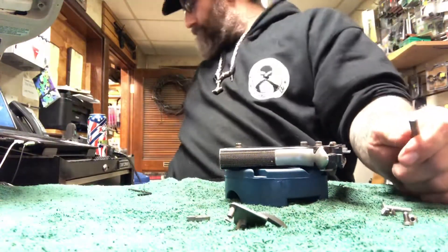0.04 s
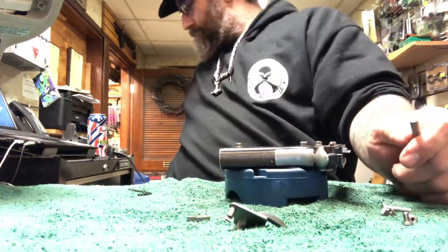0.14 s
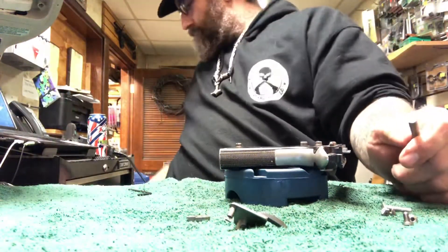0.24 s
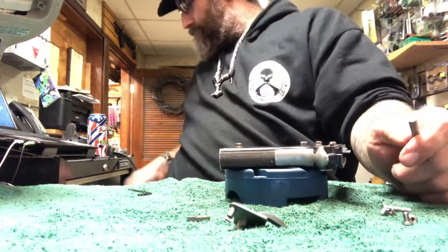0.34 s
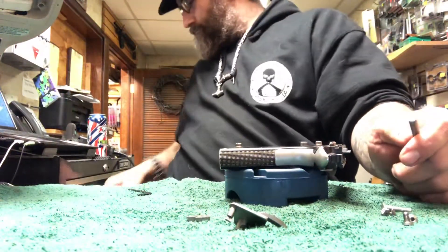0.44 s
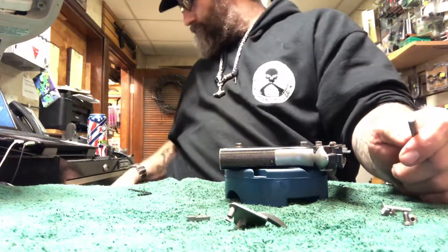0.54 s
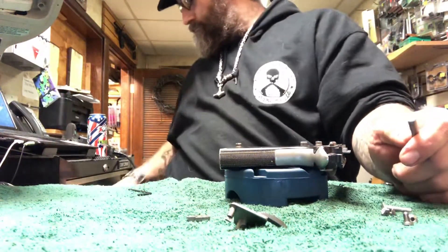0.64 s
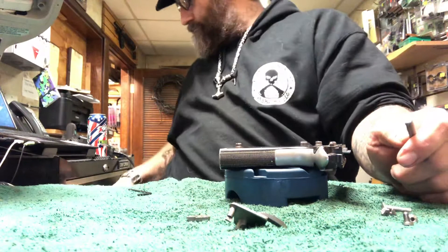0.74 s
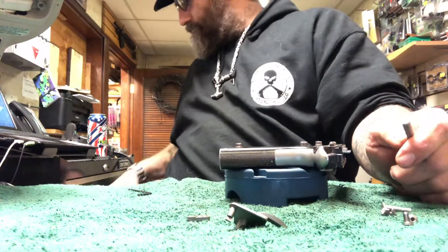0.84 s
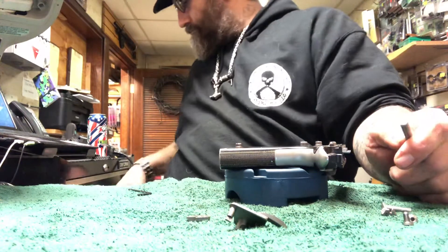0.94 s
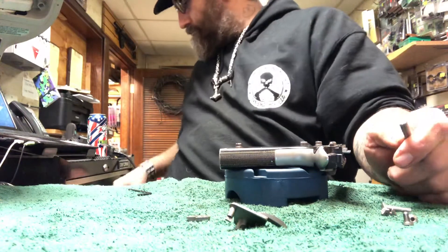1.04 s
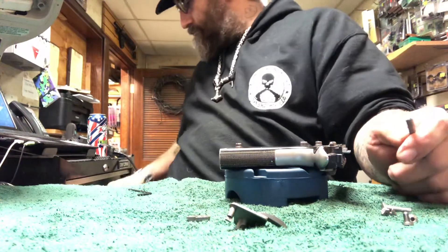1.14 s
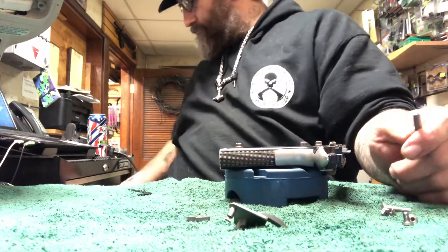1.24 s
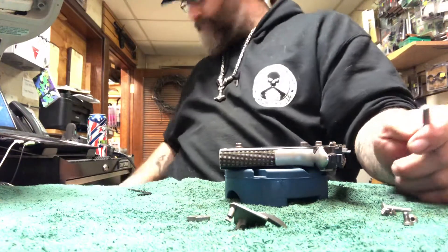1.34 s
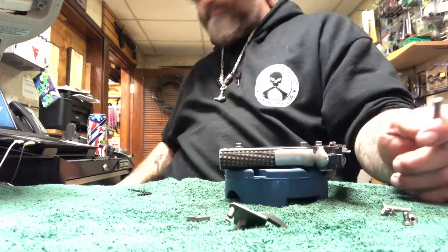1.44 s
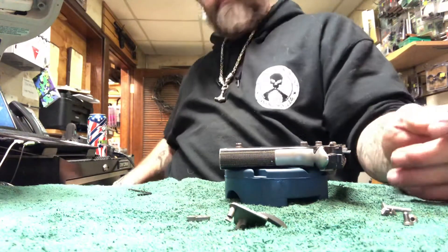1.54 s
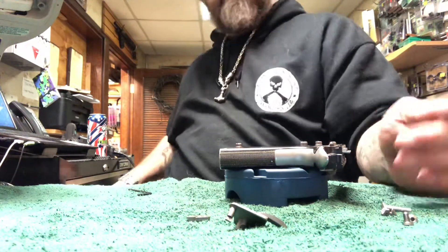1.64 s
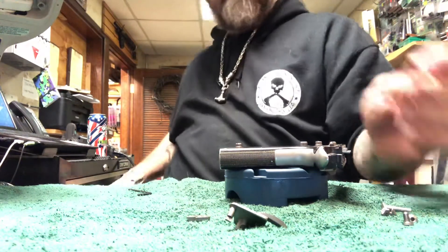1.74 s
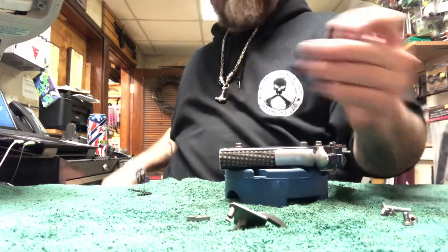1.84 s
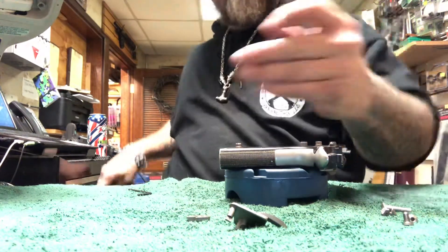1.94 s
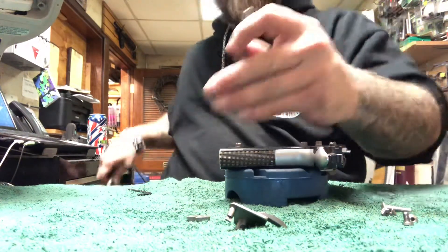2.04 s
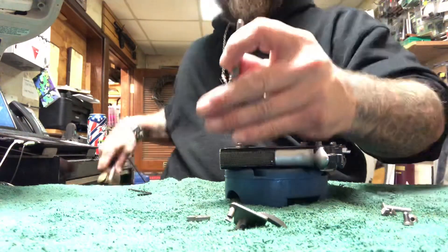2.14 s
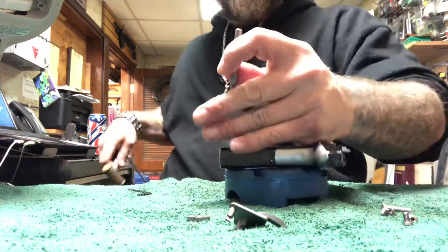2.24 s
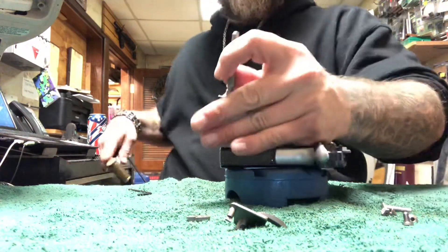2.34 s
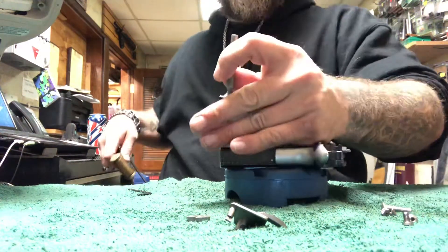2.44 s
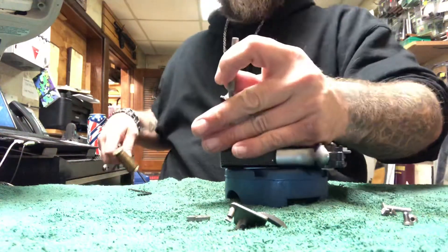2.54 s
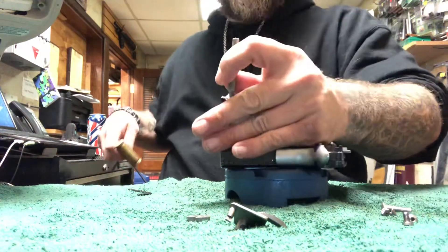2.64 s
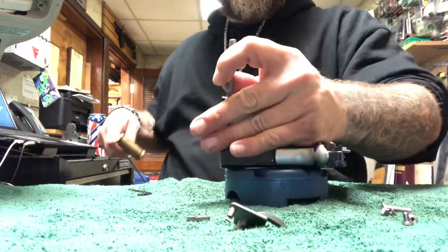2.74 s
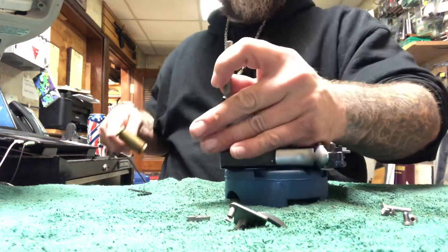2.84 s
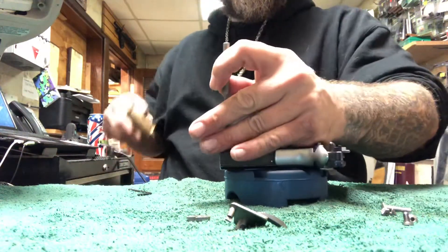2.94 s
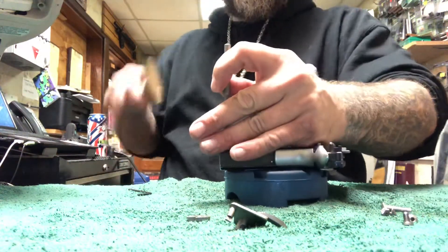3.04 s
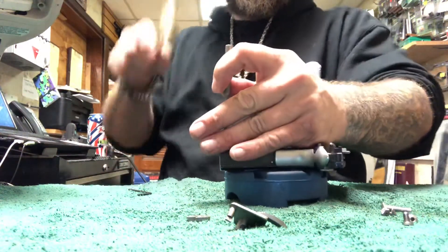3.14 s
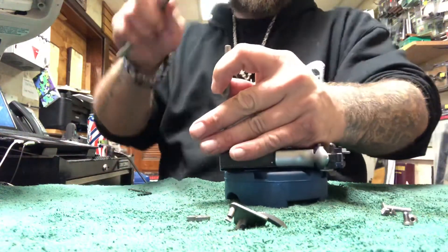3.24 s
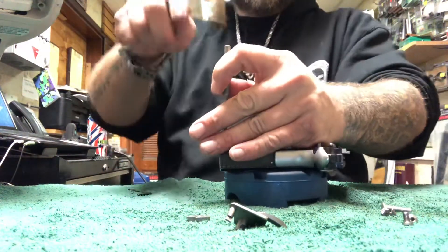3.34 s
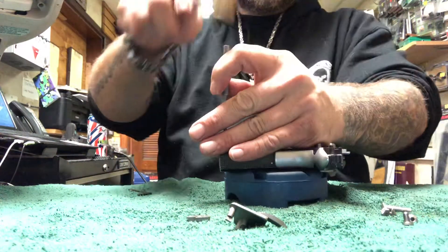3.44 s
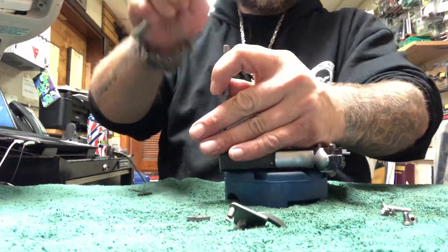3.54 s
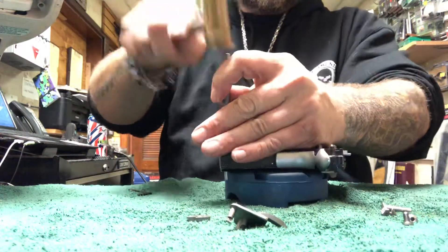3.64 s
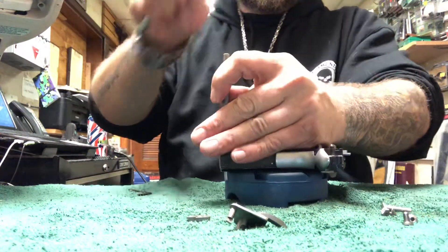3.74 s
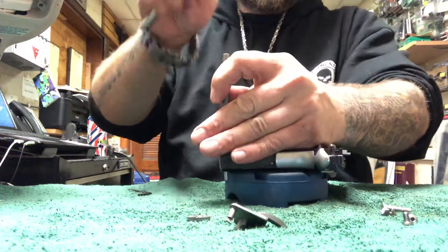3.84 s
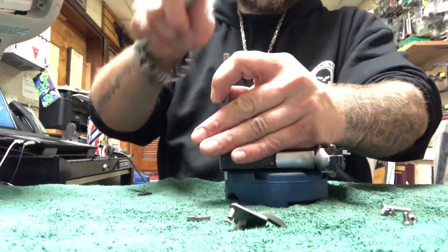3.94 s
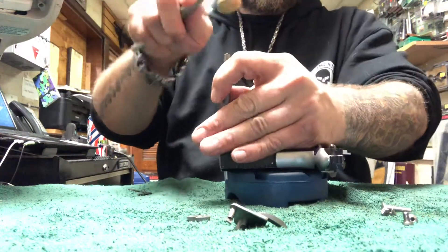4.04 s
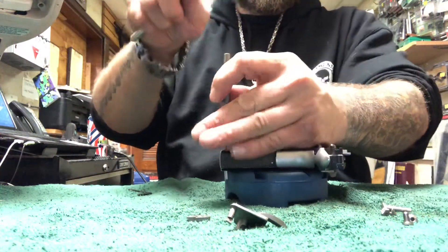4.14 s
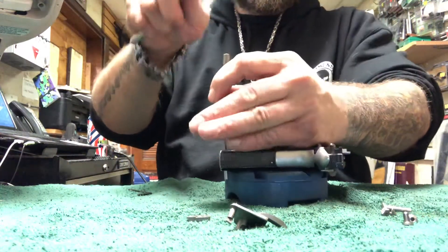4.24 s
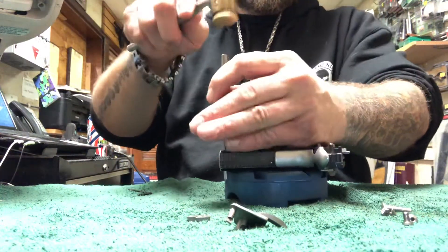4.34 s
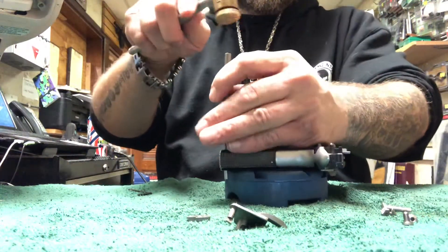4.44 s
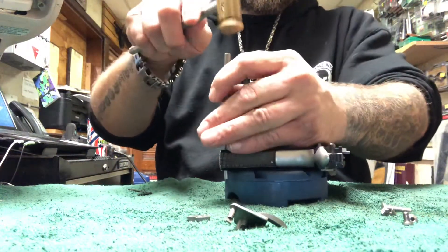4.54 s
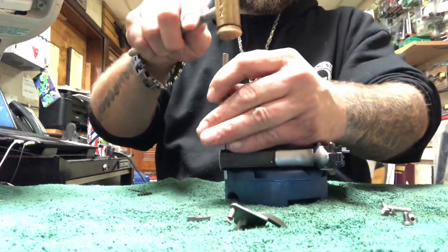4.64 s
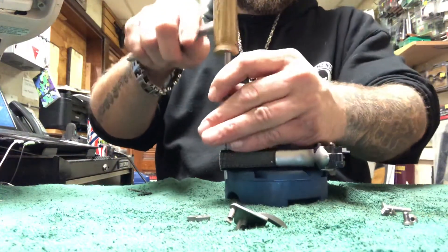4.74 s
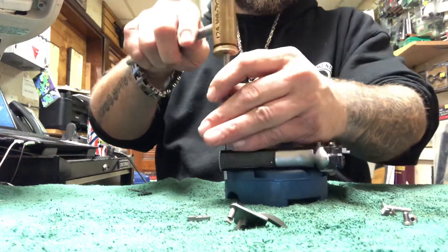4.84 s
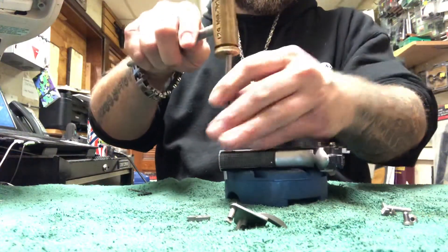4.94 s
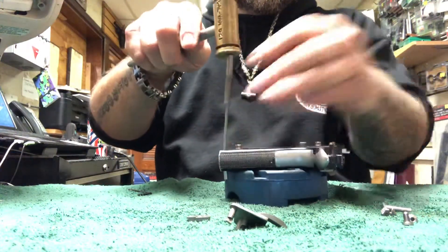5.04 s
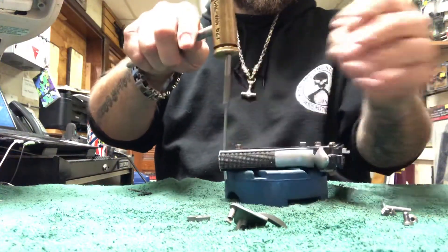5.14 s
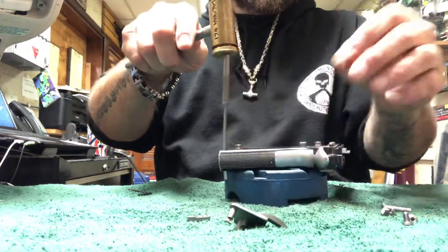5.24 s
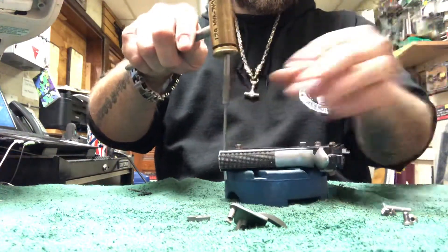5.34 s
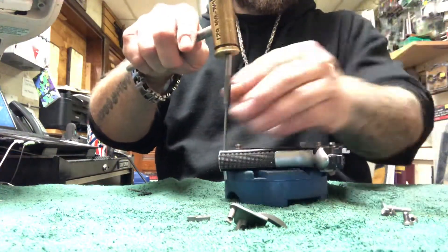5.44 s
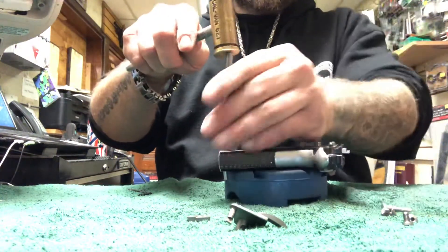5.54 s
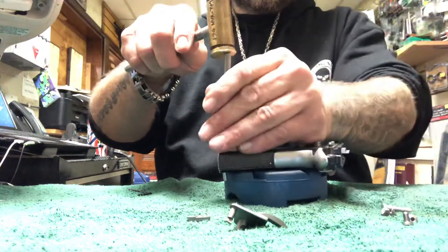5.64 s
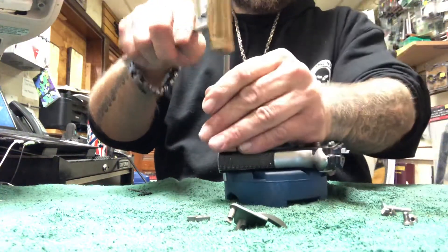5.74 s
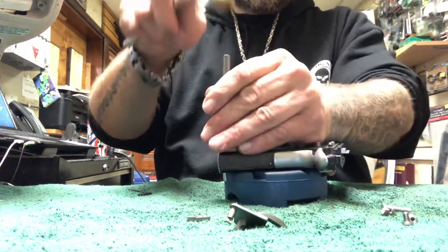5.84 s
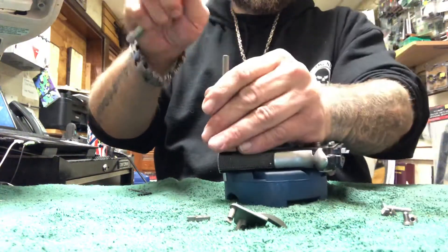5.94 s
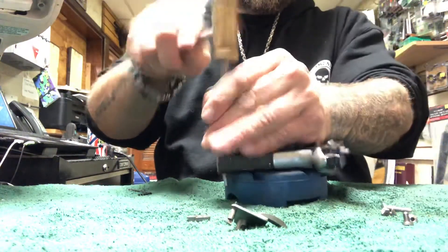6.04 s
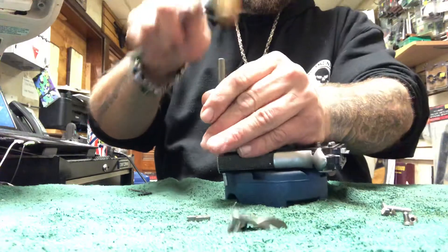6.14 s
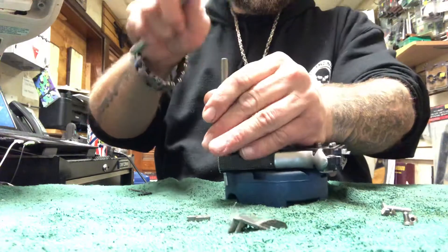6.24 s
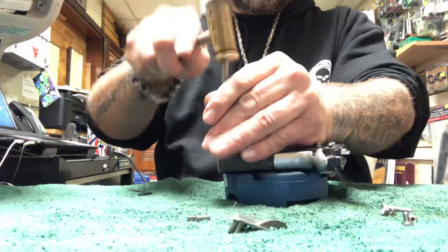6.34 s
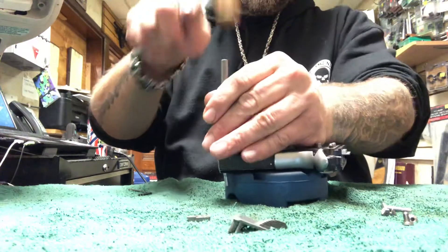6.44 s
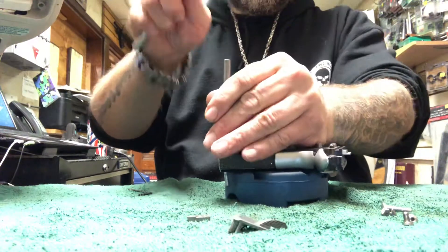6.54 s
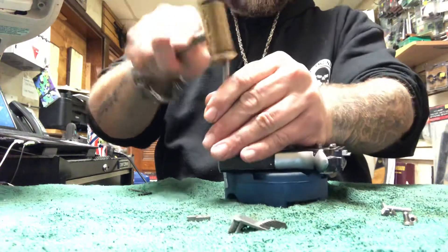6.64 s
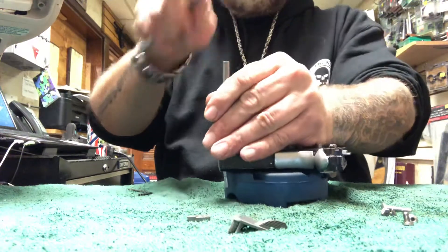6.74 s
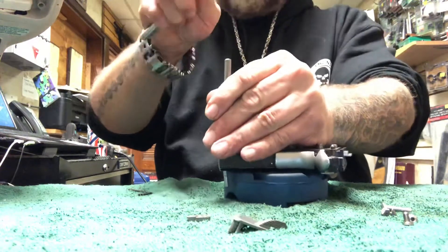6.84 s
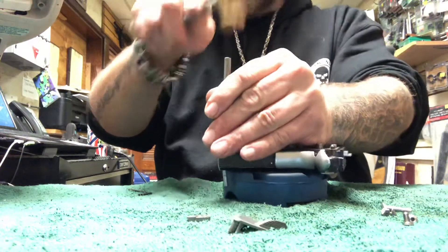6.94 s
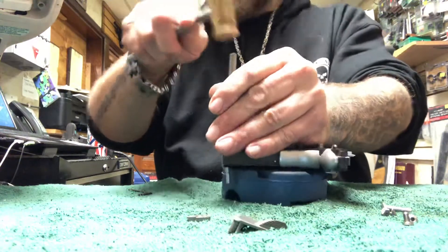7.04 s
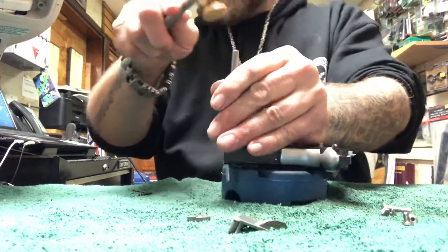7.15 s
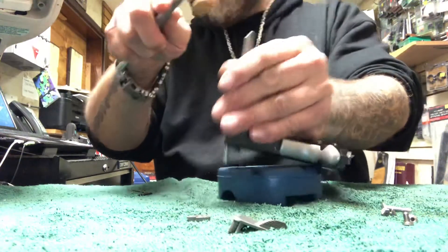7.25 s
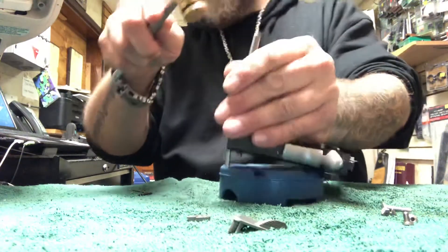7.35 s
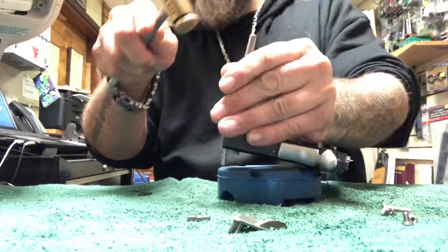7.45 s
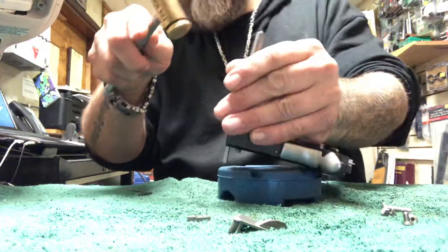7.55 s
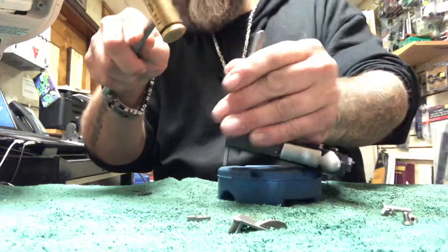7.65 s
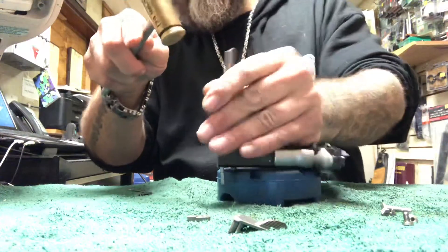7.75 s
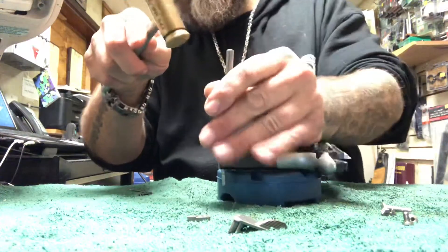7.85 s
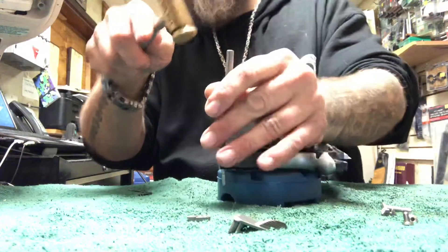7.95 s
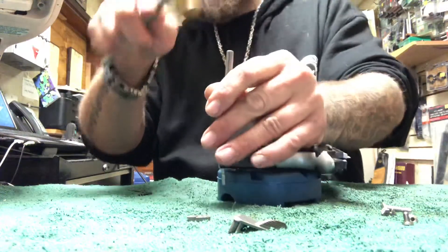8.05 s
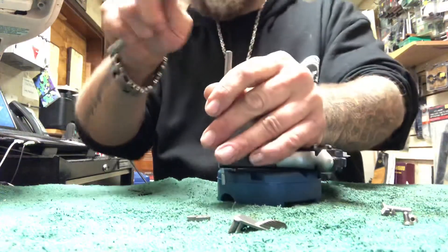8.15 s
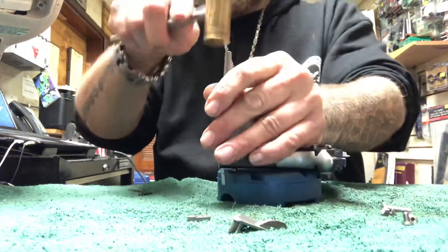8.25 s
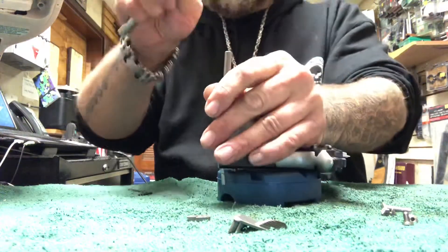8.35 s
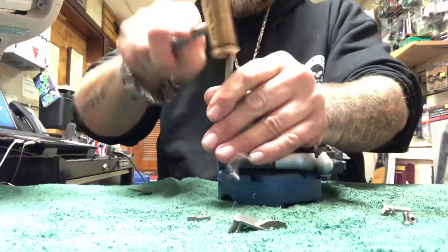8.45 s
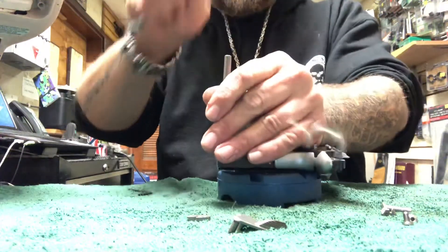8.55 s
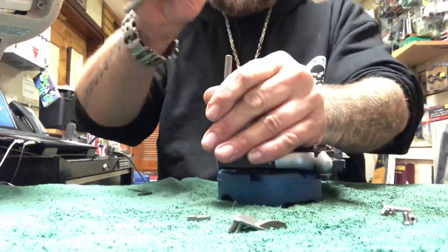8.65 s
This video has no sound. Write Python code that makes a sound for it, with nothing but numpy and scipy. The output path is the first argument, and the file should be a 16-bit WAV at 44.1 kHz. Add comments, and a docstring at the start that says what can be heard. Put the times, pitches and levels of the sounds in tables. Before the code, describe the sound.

A hammer strikes a steel punch in five sharp blows that thump a workbench, with small metal ticks and dull knocks between.

```python
"""A workshop bench in a small, cluttered room, heard close up from a camera microphone on the bench top.
A brass hammer drives a steel punch: five hard blows crack, thump the bench, rattle loose parts, jolt the
camera mount and leave some metal ringing. Around them a drawer slides, tools clink, sleeves brush past,
the punch ticks into its seat and wood and plastic knock dully. A faint whine comes and goes once,
over room air and microphone hiss."""
import sys
import numpy as np
from scipy import signal
from scipy.fft import rfft, irfft
from scipy.io import wavfile
from scipy.ndimage import uniform_filter1d

SR = 44100
rng = np.random.default_rng(int(sys.argv[2]) if len(sys.argv) > 2 else 0)


def store_pcm(level_fs):
    """Save levels as 16-bit WAV."""
    pcm = np.round(np.clip(level_fs, -1, 1) * 32767).astype(np.int16)
    wavfile.write(sys.argv[1], SR, np.atleast_2d(pcm).T)


N = 383229

# hammer blows: t/s, crack/dB, thump/dB, thump lag/s,
# damping factor and pitch factor of the bench as the hands load it, long ring/dB
BLOWS = [(3.6131, -7.5, -2, 0.0018, 1.46, 0.97, -65.5), (6.0488, -6.5, -3.5, 0.0037, 1.105, 0.98, -65),
         (6.3365, -6.5, 0, 0.0019, 1.53, 0.92, -66), (6.6191, -8.5, -2.5, .003, 0.97, .99, -57),
         (8.4261, -6, 2, .002, 1.005, 1, -99)]
# modes of the steel punch: f/Hz, level/dB, t60/s
PUNCH = [(2300, -5, .02), (3460, -2, .03), (4640, 0, .04), (5900, -3, .025), (6500, -4, .025),
         (7810, -3, .03), (9600, -4, .02), (11400, -5, .03), (12900, -4, .02)]
HIT_T = np.arange(8192) / SR  # time axis of one short hit, s


def amp(db):
    """Decibels to gain."""
    return 10 ** (np.asarray(db) / 20)


def unit_rms(x):
    """Scales to rms 1."""
    return x / np.sqrt(np.mean(x ** 2) + 1e-20)


def read(points, hz):
    """Value of a table on a log-frequency axis."""
    f, value = np.transpose(points)
    return np.interp(np.log(hz + 1), np.log(f + 1), value)


def add(mix, s, sound):
    """Mixes a sound in at s seconds."""
    part = mix[round(s * SR):][:len(sound)]
    part += sound[:len(part)]


def noise(colour, size=len(HIT_T)):
    """Noise of rms 1; colour lists f/Hz, level/dB."""
    hz = np.fft.rfftfreq(size, 1 / SR)
    return unit_rms(irfft(rfft(rng.standard_normal(size)) * amp(read(colour, hz)), size))


def hump(hz, low_db, high_db):
    """A spectrum at 0 dB at hz, low_db two octaves down and high_db one octave up."""
    return [(hz / 32, low_db - 17.5), (hz / 4, low_db), (hz, 0), (hz * 2, high_db), (hz * 8, 3 * high_db)]


def lumps(size, count):
    """Random drift of rms 1, changing over count samples."""
    return unit_rms(uniform_filter1d(rng.standard_normal(size), count))


def wobble():
    """Unsteady gain: a part that touches others rings unevenly."""
    return amp(4 * lumps(len(HIT_T), count=130))


def decay(t60, rise, t=HIT_T):
    """Rises in about rise seconds and loses 60 dB every t60 seconds."""
    return (1 - np.exp(-t / rise)) * amp(-60 * t / t60)


def swell(t, start, end, in_db_s, out_db_s):
    """Level in dB: climbs to 0 at start, holds until end, then falls."""
    return -in_db_s * np.maximum(start - t, 0) - out_db_s * np.maximum(t - end, 0)


def ring(modes, factor=1, colour=((1, 0), (2, 0))):
    """Modes struck together, each with a random strength; factor scales their pitch."""
    chance_db = 2.5 * rng.standard_normal(len(modes))
    return sum(amp(db + read(colour, hz) + extra_db - 60 * HIT_T / t60)
               * np.sin(2 * np.pi * hz * factor * HIT_T)
               for (hz, db, t60), extra_db in zip(modes, chance_db))


def room_tone():
    """Room air and microphone hiss, with drifting patches in the spectrum."""
    # air and hiss spectrum: f/Hz, relative level/dB
    colour = [(15, -34), (25, 1), (54, -4), (132, 1), (194, -8), (383, -0.5), (546, -12.5), (845, -10.5),
              (968, -12.5), (1050, -14), (1340, -18), (7700, -25.5), (8590, -28.5), (12000, -31),
              (15200, -32.5), (17000, -51)]
    _, _, bins = signal.stft(noise(colour, N), SR, nperseg=1024, noverlap=768)
    patches = unit_rms(uniform_filter1d(uniform_filter1d(rng.standard_normal(bins.shape), 8, 0), 14, 1))
    _, hiss = signal.istft(bins * amp(2 * patches), SR, nperseg=1024, noverlap=768)
    return amp(-64.5) * unit_rms(hiss[:N])


def drawer_slides():
    """The drawer slides and hands shift: swells of low, lumpy friction noise."""
    # movements: peak t/s, level/dB, swell/(dB/s), fade/(dB/s)
    moves = [(.04, -52, 40, 78), (.282, -63, 600, 300), (1.399, -56.5, 338, 163), (1.491, -52, 194, 491)]
    # friction spectrum: f/Hz, relative level/dB
    colour = [(24, -32), (40, -7), (293, 2), (485, -4), (550, -0.5), (637, -7.5), (872, -7.5), (6000, -36),
              (7800, -66), (13200, -120)]
    t = np.arange(N) / SR
    level = sum(amp(db + swell(t, s, s, up, down)) for s, db, up, down in moves)
    return level * amp(0.49 * lumps(N, count=600)) * noise(colour, N)


def sleeves():
    """Sleeves and fingers brush past in short, crackly puffs."""
    # brushes: t/s, level/dB, length/s, centre f/Hz
    brushes = [(0.182, -72.5, 0.16, 11100), (0.425, -72, 0.096, 13000), (0.698, -70, 0.057, 11600),
               (5.535, -57.5, 0.057, 2500), (6.509, -61, 0.26, 11600), (6.75, -69.5, 0.12, 11100),
               (6.99, -60, 0.1, 2530), (7.223, -63, 0.091, 2175)]
    air = np.zeros(N)
    for s, db, length, hz in brushes:
        size = round(length * SR)
        level = amp(db + 4 * lumps(size, count=60)) * np.hanning(size)
        add(air, s, level * noise(hump(hz, -3, -14.5), size))
    return air


def bench_thump(spread_db=2.5, damping=1, factor=1):
    """The bench top bends: each mode builds up at its own pace, a little differently on every hit."""
    # bench top modes: f/Hz, level/dB, t60/s, rise/s
    modes = [(63, -6, .21, 0.021), (115, -7.5, .13, .015), (138.3, 0, .21, 0.0078), (210, -11, .18, 0.0093),
             (287, -12.5, .22, 0.0041), (382, -22, 0.32, 0.006), (453.4, -19.5, .17, .007),
             (592, -24, 0.25, .004), (683, -23.5, 0.1, .008), (798, -24, .2, .01), (977, -19.5, .1, .011),
             (1066, -22, .2, 0.028), (1287, -23, 0.13, .011)]
    t = np.arange(SR // 3) / SR
    chance = rng.standard_normal((len(modes), 2))
    return sum(amp(db + spread_db * force - 60 * t * damping / t60) * (1 - np.exp(-(t / rise) ** 3))
               * np.sin(2 * np.pi * hz * factor * (1 + 0.011 * detune) * t)
               for (hz, db, t60, rise), (force, detune) in zip(modes, chance))


def steel_ticks():
    """Steel touches steel: a hard snap, a short buzz, the ring of the punch and a slight thump."""
    # contacts: t/s, level/dB, centre f/Hz, relative level two octaves down/dB
    contacts = [(.4449, -50.5, 15100, -20), (.475, -52.5, 4200, -25), (.7871, -55, 3880, -23),
                (2.5111, -30.5, 5140, -9), (2.5975, -44.5, 4300, 1), (2.6801, -47, 3000, 1),
                (2.748, -39, 4300, -1), (2.8326, -42, 8250, -6), (3.0055, -51, 7350, 1),
                (3.049, -30.5, 15000, -17), (3.264, -55, 12000, -10), (3.335, -49, 12300, -31),
                (3.344, -46, 13000, -24), (3.3734, -48.5, 12000, -7), (3.7953, -45.5, 10300, -17),
                (3.806, -41.5, 12200, -9.5), (3.8694, -49, 13650, -19), (3.985, -28.5, 13100, -29),
                (4.7615, -20, 5076, -11.5), (4.8458, -35, 4350, -12), (6.175, -44.5, 3000, -8),
                (6.188, -50.5, 3000, -12), (6.445, -44.5, 3940, -1), (6.587, -52, 10900, -30),
                (6.787, -47.5, 12040, -22), (6.8063, -55, 2220, -15), (7.013, -45, 3500, -2.5),
                (7.048, -56, 3000, -5.5), (8.3952, -31.5, 13000, -28), (8.4992, -20, 13500, -30),
                (8.5453, -43, 13000, -30), (8.5614, -46, 9000, 10), (8.5782, -29, 12100, -28),
                (8.5874, -43, 11700, 1), (8.5987, -37, 12000, -14), (8.6272, -36, 13000, -25),
                (8.6464, -32, 12900, -24), (8.657, -23.5, 3570, -21)]
    # faint extra ticks while the punch is seated
    fidgets = [(3.1 + .45 * when, -59 + 4 * force, 12500, -17) for when, force in rng.random((6, 2))]
    air, body = np.zeros((2, N))
    for s, db, hz, low_db in contacts + fidgets:
        colour = hump(hz, low_db, -12)
        buzz = .3 * decay(t60=.041 * (5000 / hz) ** .5, rise=.003)  # higher ticks buzz shorter
        snap = noise(colour) * (decay(t60=.006, rise=.0001) + buzz)
        punch = amp(-13) * ring(PUNCH, colour=colour) * wobble()
        add(air, s, amp(db) * (snap + punch))
        add(body, s, amp(db - 31.5) * bench_thump())
    return air, body


def dull_knocks():
    """Knocks on wood and plastic: a puff of noise, a hollow ring and a thump in the bench."""
    # knocks: t/s, level/dB, centre f/Hz, decay scale/s, relative thump/dB
    knocks = [(.574, -41, 928, .3, -4), (0.599, -41.5, 428, .28, -18), (.93, -58, 790, 0.5, -19),
              (1.454, -49.5, 590, 0.27, -16), (1.561, -40.5, 794, .24, -9), (2.326, -46, 1160, .22, -3.5),
              (2.833, -45, 783, .05, -4), (3.206, -45.5, 1040, .22, -10.5), (4.761, -25.5, 1450, .03, -12),
              (4.845, -43, 1150, .026, 1.5), (5.549, -50, 770, .05, -0.5), (5.559, -43, 1418, .12, -1),
              (7.746, -43.5, 1274, .047, -.5), (7.815, -54.5, 718, .06, 0.5),
              (8.659, -31.5, 524, 0.073, -15)]
    # hollow modes: ratio to the centre, level/dB, t60/s before the knock's own fade
    modes = [(.45, -3, 0.044), (.72, -6, 0.09), (1.0, 4, 0.033), (1.22, -11.5, 0.032), (1.47, -47, 0.23),
             (1.9, -19.5, 0.012), (2.5, -5, 0.026)]
    air, body = np.zeros((2, N))
    for s, db, hz, fade, thump_db in knocks:
        puff = noise(hump(hz, -7, -12)) * decay(t60=.5 * fade, rise=.00037)
        hollow = ring(modes, hz) * decay(t60=2 * fade, rise=.0011) * wobble()
        add(air, s, amp(db) * (puff + hollow))
        add(body, s, amp(db + thump_db) * bench_thump())
    return air, body


def tool_clinks():
    """Tools collide in the drawer: a bright jingle over modes that each waver separately."""
    # collisions: t/s, level/dB, pitch factor
    clinks = [(1.4687, -43.5, 1.01), (1.5878, -52, .95), (1.712, -66, .95)]
    # tool modes: f/Hz, level/dB, t60/s
    modes = [(3190, 3.5, 0.028), (3915, 8, 0.057), (4360, -10.5, 0.14), (7200, -3, 0.091),
             (7600, 1.5, 0.12), (11350, -10, 0.13)]
    air = np.zeros(N)
    attack = 1 - np.exp(-HIT_T / .0011)
    for s, db, factor in clinks:
        jingle = 1.13 * noise(hump(5400, 8.7, -0.91)) * amp(-60 * HIT_T / .21)
        tones = sum(wobble() ** 1.76 * ring([mode], factor) for mode in modes)
        add(air, s, amp(db) * attack * (jingle + tones))
    return air


def singing_punch():
    """Now and then the punch is held loosely and one mode sings on."""
    # lingering modes: t/s, f/Hz, level/dB, t60/s
    notes = [(3.049, 4710, -50, 0.064), (3.984, 4680, -38, 0.039), (4.851, 4670, -47, 0.038),
             (6.1, 4640, -54.5, .15), (6.393, 4664, -52, 0.2), (6.662, 9700, -54, 0.14),
             (8.457, 4570, -45, 0.28), (8.503, 11650, -53, 0.27)]
    air = np.zeros(N)
    for s, hz, db, t60 in notes:
        add(air, s, amp(db) * decay(t60, rise=.00197) * np.sin(2 * np.pi * hz * HIT_T) * wobble() ** 1.8)
    return air


def hammer_blows():
    """Brass cracks on steel and the bench thumps; loose parts rattle, shelves and drawers shake on."""
    # spectrum of brass on steel: f/Hz, relative level/dB
    crack_colour = [(290, -46.5), (500, -6), (2290, -12.5), (4640, -15.5), (5220, -11.5), (7330, -7.5),
                    (8370, -15.5), (9280, -6.5), (11600, -3.5), (15100, -4.5), (17000, -39.5)]
    # spectrum of the loose parts: f/Hz, relative level/dB
    rattle_colour = [(180, -19), (300, -5.5), (542, -13), (899, -9.5), (1350, -18.5), (2480, -28.5),
                     (3360, -32), (5670, -30), (13200, -39.5), (15600, -39), (17000, -86.5)]
    # spectrum of the shelves and drawers: f/Hz, relative level/dB
    rumble_colour = [(18, -49), (30, -16.5), (146, 0), (194, -17), (265, -14), (500, -24), (874, -17),
                     (1190, -27.5), (3000, -36), (3900, -68.5), (6600, -120)]
    air, body = np.zeros((2, N))
    first_contact = 1.5 * decay(t60=.0033, rise=.0001)
    settling = np.exp(-(HIT_T / .083) ** 2)  # the loose parts come to rest
    for s, crack_db, thump_db, lag, damping, factor, _ in BLOWS:
        crack = noise(crack_colour) * (first_contact + decay(t60=.011, rise=.0005))
        add(air, s, amp(crack_db) * (crack + amp(-22.5) * ring(PUNCH)))
        shake_db = thump_db - 9.5 * (damping - 1)  # a firm hold quiets whatever lies loose
        hops_db = 2 * lumps(len(HIT_T), count=160)
        rattle = noise(rattle_colour) * decay(t60=.32, rise=.0011) * settling
        add(air, s + .0115, amp(shake_db - 16.5 + hops_db) * rattle)  # parts land as the bench swings back
        add(body, s + lag, amp(thump_db) * bench_thump(1.6, damping, factor))
        rumble = noise(rumble_colour, SR) * decay(t60=1.4, rise=.022, t=np.arange(SR) / SR)
        add(body, s, amp(shake_db - 39.5) * rumble)
    return air, body


def ringing_metal():
    """Some metal on the bench rings on as a beating pair of modes; each blow restarts it."""
    # the two modes: f/Hz, signed gain
    modes = [(851.3, 1), (854.75, -.8)]
    body = np.zeros(N)
    stops = [blow[0] for blow in BLOWS[1:]] + [N / SR]
    for (s, *_, ring_db), stop in zip(BLOWS, stops):
        t = np.arange(0, stop - s, 1 / SR)
        pair = sum(gain * np.sin(2 * np.pi * hz * (t - .055)) for hz, gain in modes)  # first dip at 55 ms
        add(body, s, amp(ring_db) * decay(t60=5, rise=.01, t=t) * pair)
    return body


def mount_chatter(length_s=.0062):
    """The camera mount chatters for a few cycles as the bench swings back."""
    # jolts: t/s, level/dB, f/Hz
    jolts = [(3.6249, -10.5, 1003), (3.6362, -9, 1022), (6.063, -6, 1045), (6.3499, -7, 1041),
             (6.6333, -8.5, 1125), (8.44, -6.5, 972)]
    body, t = np.zeros(N), np.arange(0, length_s, 1 / SR)
    for s, db, hz in jolts:
        add(body, s, amp(db) * np.sin(np.pi * t / length_s) * np.sin(2 * np.pi * hz * t))
    return body


def whine():
    """A faint, unsteady tone with its octave fades in, steps up, holds and fades out."""
    t = np.arange(N) / SR
    hz = np.interp(t, (5.13, 5.18), (800, 886)) + 2.8 * lumps(N, count=2000)
    phase = 2 * np.pi * np.cumsum(hz) / SR
    db = -68.5 + 3 * lumps(N, count=1500) + swell(t, 5.12, 5.72, in_db_s=146, out_db_s=109)
    return amp(db) * (np.sin(phase) + amp(-6) * np.sin(2 * phase))


def room(x):
    """A small, cluttered room: dense reflections, each band dying at its own speed."""
    # reverberation times: f/Hz, t60/s
    reverb_times = [(60, 0.96), (250, 0.47), (1000, 0.081), (3000, 0.13), (8000, 0.16), (16000, 0.045)]
    hz, t, bins = signal.stft(rng.standard_normal(SR), SR, nperseg=512)
    _, tail = signal.istft(bins * amp(-60 * t / read(reverb_times, hz)[:, None]), SR, nperseg=512)
    tail *= 1 - np.exp(-np.arange(len(tail)) / SR / .0041)  # reflections build up
    return signal.fftconvolve(x, tail / np.linalg.norm(tail))[:N]


def scene():
    """Hits reach the one microphone through the air and the body of the bench; both feed the room."""
    air, body = np.sum([steel_ticks(), dull_knocks(), hammer_blows()], axis=0)
    air += tool_clinks() + singing_punch()
    body += ringing_metal() + mount_chatter()
    reflections = room(amp(-12.5) * air + amp(-31) * body)
    return (air + body + reflections + room_tone() + drawer_slides() + sleeves() + whine())[None]


def record(dry):
    """The close microphone overloads softly on the blows; its band ends at 16.2 kHz."""
    knee, ceiling = .55, .9
    headroom = ceiling - knee
    over = np.maximum(abs(dry) - knee, 0)
    soft = dry - np.sign(dry) * (over - headroom * np.tanh(over / headroom))
    lowpass = signal.firwin(255, 16200, window=("kaiser", 9), fs=SR)
    return signal.oaconvolve(soft, lowpass[None], "same")


dry = scene()
out = record(dry)
store_pcm(out)
```